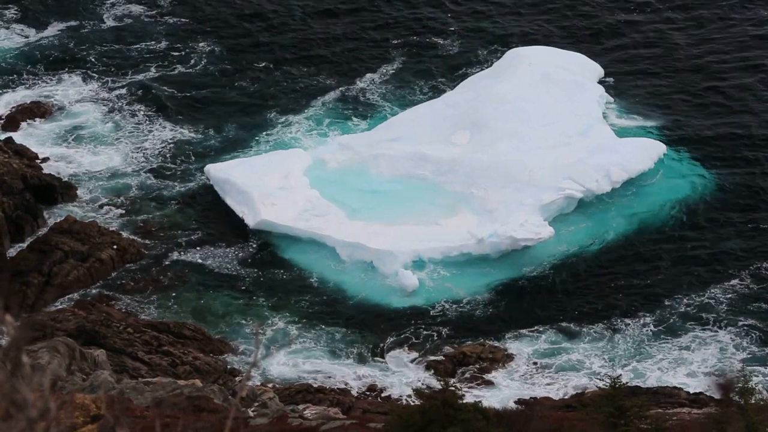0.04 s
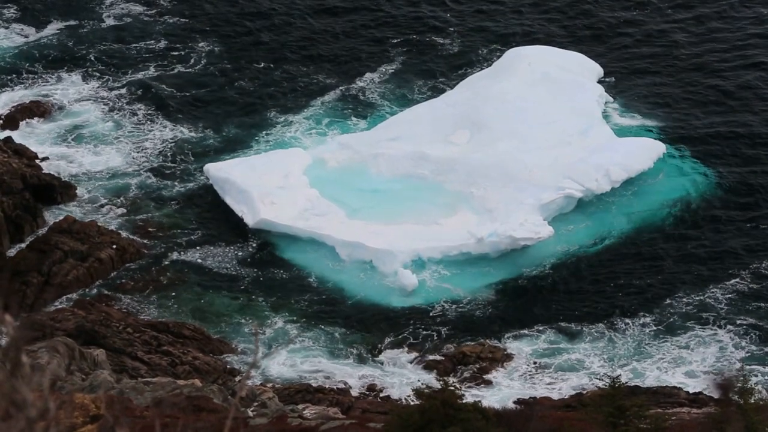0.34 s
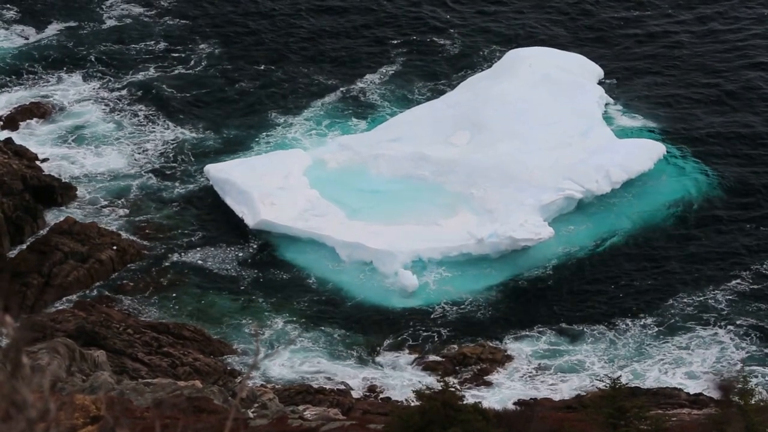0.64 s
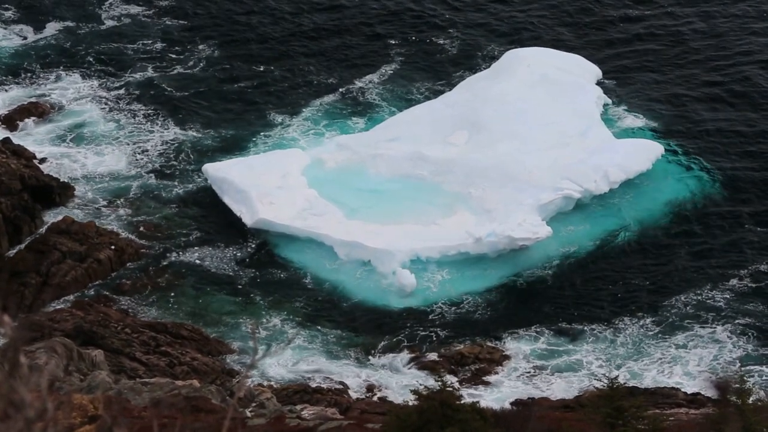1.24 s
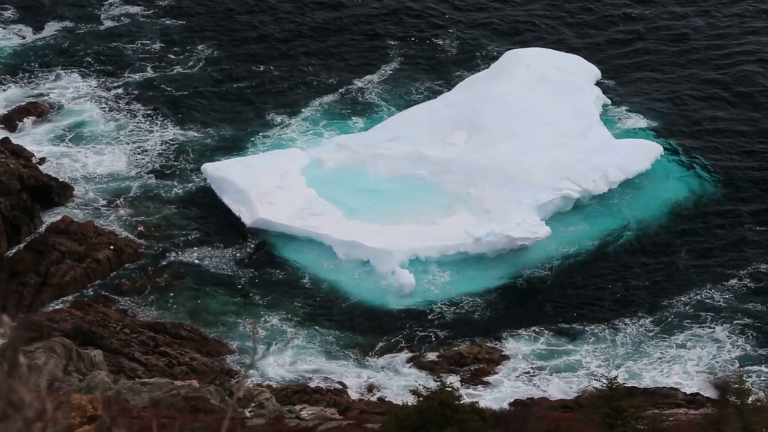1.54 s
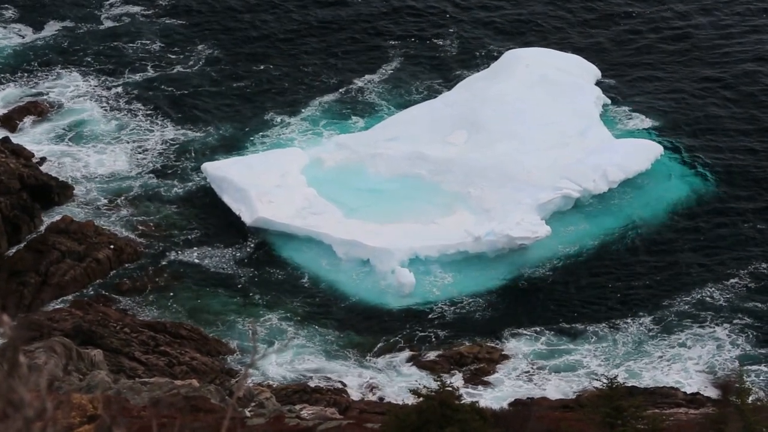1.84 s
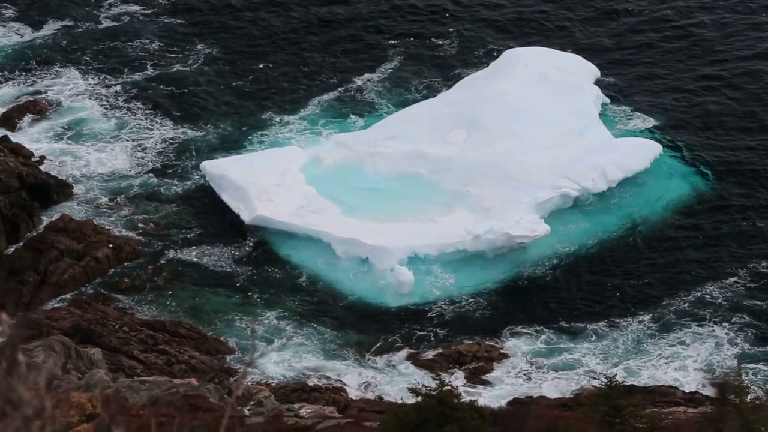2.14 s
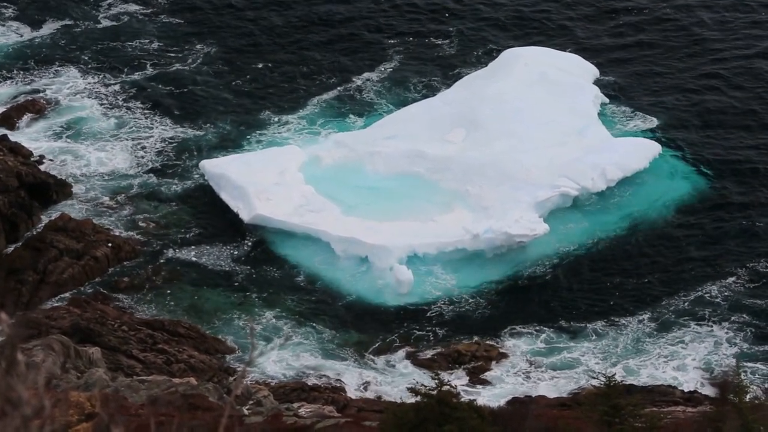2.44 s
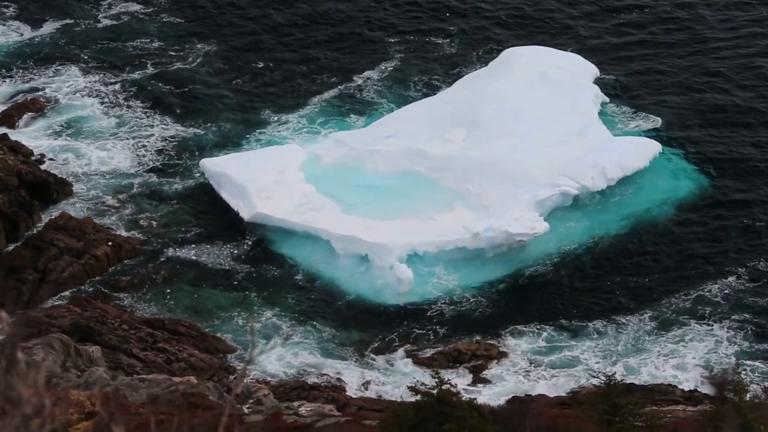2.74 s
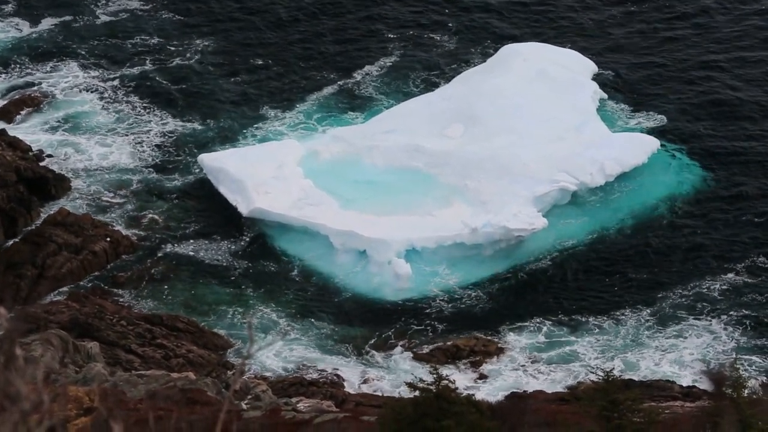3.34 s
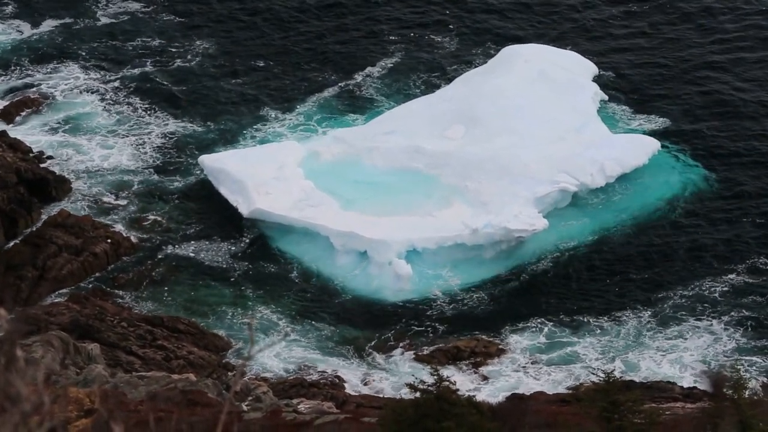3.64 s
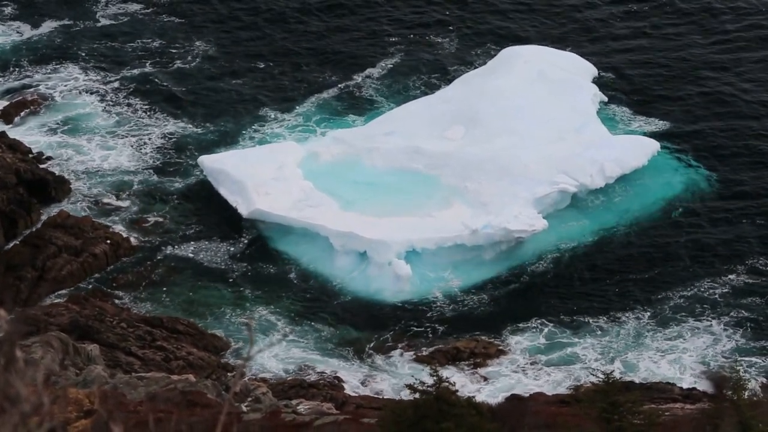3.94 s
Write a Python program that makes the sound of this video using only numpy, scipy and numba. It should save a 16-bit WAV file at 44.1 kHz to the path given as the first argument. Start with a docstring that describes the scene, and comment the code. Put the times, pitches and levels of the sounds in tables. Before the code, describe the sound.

Wind rumbles and thumps on a cliff-top microphone, hard at first, then in scattered lighter puffs. Far below, surf washes over rocks with a soft roar and a faint hiss of foam.

```python
"""Gusts rumble on the microphone, hard in the first second, then in scattered puffs, as eddies
strike it and the airflow tears off its housing. It stands on a cliff top; far below, surf washes
over rocks: a soft roar, a hiss of foam above it and a few small slaps of water. The hardest buffets
overload the recorder, whose gain control ducks the sea and slowly lets it back."""
import sys
import numpy as np
from scipy import signal
from scipy.fft import rfft, irfft
from scipy.io import wavfile
from scipy.ndimage import uniform_filter1d
from numba import njit

SR = 44100
rng = np.random.default_rng(int(sys.argv[2]) if len(sys.argv) > 2 else 0)


def persist_wave(psi):
    """Save psi, clipped to +-1, as 16-bit WAV."""
    counts = np.round(np.clip(psi, -1, 1) * 32767).astype(np.int16)
    wavfile.write(sys.argv[1], SR, np.atleast_2d(counts).T)


N = 176400


def undb(db):
    """Decibels to gain."""
    return 10 ** (np.asarray(db) / 20)


def unit(x):
    """Scale to rms 1."""
    return x / np.sqrt(np.mean(x ** 2))


def even(x, size):
    """Hold the level of a noise near 1 over spans of size samples."""
    return x / np.sqrt(uniform_filter1d(uniform_filter1d(x ** 2, size), size))


def curve(rows):
    """Join rows of time in seconds and value by straight lines."""
    return np.interp(np.arange(N) / SR, *np.array(rows).T)


def walk(rate):
    """Random levels held 1 / rate seconds and smoothed twice; spread near 1."""
    hold = int(SR / rate)
    held = rng.standard_normal(4096)[np.arange(N) // hold % 4096]
    return 1.3 * uniform_filter1d(uniform_filter1d(held, hold), hold)


def coloured_noise(points):
    """Noise at rms 1 whose spectrum follows (Hz, dB) points and falls away past their ends."""
    freqs = np.maximum(np.fft.rfftfreq(N, 1 / SR), 1)
    hz, db = np.array(points).T
    shape = undb(np.interp(np.log(freqs), np.log(hz), db))
    skirts = np.minimum(freqs / hz[0], 1) ** 2 * np.minimum(hz[-1] / freqs, 1) ** 5
    return unit(irfft(rfft(rng.standard_normal(N)) * shape * skirts, N))


def bands(x, low_hz, count):
    """Split x into overlapping half-octave bands that add up to x; gives (Hz, band) pairs."""
    freqs = np.maximum(np.fft.rfftfreq(N, 1 / SR), 1)
    place = np.clip(2 * np.log2(freqs / low_hz), 0, count - 1)
    spectrum = rfft(x)
    return [(low_hz * 2 ** (k / 2), irfft(spectrum * np.maximum(1 - abs(place - k), 0), N))
            for k in range(count)]


def wind():
    """Turbulence on the microphone: stronger gusts shed smaller eddies, so the rumble brightens."""
    # Wind pressure on the microphone. Each row: time in seconds, level in dB.
    gust_levels = [(0, -14), (.02, -14), (.09, -13), (.13, -20), (.17, -16.5), (.2, -27.5), (.25, -19),
                   (.31, -13.5), (.345, -10.5), (.38, -15.5), (.44, -18.5), (.48, -6.5), (.51, -13.5),
                   (.56, -10.5), (.59, -9), (.64, -16.5), (.67, -9), (.71, -9), (.76, -18), (.8, -18.5),
                   (.86, -22.5), (1.02, -23.5), (1.09, -35), (1.16, -27), (1.27, -35), (1.37, -37),
                   (1.42, -33.5), (1.46, -25.5), (1.49, -23), (1.55, -15), (1.62, -25), (1.67, -39.5),
                   (1.77, -38.5), (1.82, -29), (1.87, -40.5), (1.98, -41.5), (2.04, -33), (2.13, -39),
                   (2.29, -47), (2.35, -38.5), (2.48, -36), (2.7, -50), (3.19, -50.5), (3.24, -38),
                   (3.32, -46), (3.4, -41), (3.6, -48), (3.67, -42), (3.75, -40), (3.8, -27.5),
                   (3.85, -30.5), (3.91, -31.5), (4, -38.5)]
    # Turbulence in a moderate gust. Each row: frequency in Hz, relative density in dB.
    rumble_spectrum = [(18, -1), (35, 4.5), (65, 3), (125, -1.5), (200, -14.5), (320, -26), (550, -43.5),
                       (1000, -59.5), (2000, -80)]
    trim_db, moderate_db, brighten = 2, -19.5, 0.24  # brighten: dB per octave for each dB of gust
    flutter_db, full_flutter_hz = 6.5, 300
    gust_db, eddies = curve(gust_levels), walk(rate=70)
    flow = even(coloured_noise(rumble_spectrum), size=1800)
    out = 0
    for hz, band in bands(flow, low_hz=27, count=12):
        octaves = max(np.log2(hz / 80), 0)
        tilt = brighten * octaves * (gust_db - moderate_db)
        flutter = flutter_db * min(hz / full_flutter_hz, 1) ** 2 * (eddies - .5)
        out = out + band * undb(tilt + flutter)
    return out * undb(gust_db + trim_db)


def churn(x):
    """Moving water: all bands surge together and each flickers on its own."""
    surge_db, flicker_db = -0.87, 0.43
    surge = surge_db * walk(rate=3.5)
    return sum(band * undb(surge + flicker_db * walk(rate=26))
               for _, band in bands(x, low_hz=150, count=13))


def surf():
    """Breakers roar and foam hisses; heard from the cliff top, single splashes merge into a wash."""
    # Roar of the breakers and hiss of the foam. Each row: frequency in Hz, relative density in dB.
    roar_spectrum = [(30, 4.5), (100, 1.5), (170, -1), (280, -4.5), (420, -4.5), (580, -2), (800, -8.5),
                     (1080, -10.5), (1400, -16), (1800, -27.5), (2600, -36), (5000, -50)]
    foam_spectrum = [(900, 3.5), (1600, 6), (2200, 5), (2800, 1.5), (3600, 2), (5000, -1.5), (7000, -4),
                     (9000, -8.5), (10500, -19.5)]
    # How each swells and sinks. Each row: time in seconds, level in dB.
    roar_levels = [(0, -39), (.15, -38), (.4, -46.5), (.9, -44), (1.4, -42), (1.9, -40.5), (2.3, -43),
                   (2.7, -44), (3.3, -43), (4, -41.5)]
    foam_levels = [(0, -50.5), (.15, -58), (.35, -60), (.55, -60.5), (.9, -61), (1.6, -60), (2, -59),
                   (2.3, -58), (2.6, -59.5), (3.3, -58.5), (4, -59)]
    roar = churn(coloured_noise(roar_spectrum))
    foam = churn(coloured_noise(foam_spectrum))
    return roar * undb(curve(roar_levels)) + foam * undb(curve(foam_levels))


def flaps():
    """Air tears off the microphone housing in bursts of fine turbulence, brighter than the rumble."""
    # Each row: centre in seconds, level in dB, half length in seconds, top of the spectrum in Hz.
    bursts = [(0.093, -18, 0.013, 400), (.261, -15, 0.0049, 623), (0.276, -22, 0.0042, 600),
              (0.298, -14, 0.0066, 470), (0.336, -10.5, .003, 774), (0.356, -17.5, 0.018, 667),
              (0.398, -11.5, 0.0028, 500), (0.484, -20, 0.0053, 530), (0.538, -19, 0.0092, 507),
              (0.611, -20.5, .01, 400), (0.646, -9, 0.005, 577), (0.689, -20, 0.005, 560),
              (0.712, -22, 0.0091, 600), (0.797, -17.5, 0.0084, 472), (1.379, -18.5, 0.012, 367),
              (1.535, -22, 0.007, 285)]
    low_hz, fall_db = 178, -21.5
    t, out = np.arange(N) / SR, 0
    for at, db, half_length, top_hz in bursts:
        tear = even(coloured_noise([(low_hz, 0), (top_hz, fall_db)]), size=500)
        out = out + undb(db) * tear * np.exp(-((t - at) / half_length) ** 2)
    return out


def buffets():
    """Each eddy that strikes the microphone is one push of pressure with suction before and after."""
    # Each row: centre in seconds, peak in dB, pitch in Hz.
    eddies = [(.164, -4.5, 52), (.234, -3, 70), (0.2575, 3, 80.3), (0.342, -2.5, 150), (0.399, -4, 153),
              (.46, 9, 91), (0.703, 1.5, 61.1), (0.784, 2.5, 71.5), (1.017, -13.5, 72), (1.357, -7, 62),
              (1.368, 0, 85.2), (1.454, -15.5, 42), (1.571, -7.5, 69.3), (1.623, -11, 49.2),
              (1.817, -18.5, 55), (2.044, -26, 31.8), (2.077, -17, 69), (3.783, -19, 75), (3.816, -19, 44),
              (3.885, -34, 61.5), (3.915, -20, 51)]
    t, out = np.arange(N) / SR, 0
    for at, db, hz in eddies:
        offset_squared = np.minimum((np.pi * hz * (t - at)) ** 2, 50)
        out = out + undb(db) * (1 - 2 * offset_squared) * np.exp(-offset_squared)
    return out


def slaps():
    """Water slaps the rocks below: short bursts of noise in one broad resonance each."""
    # Each row: start in seconds, level in dB, resonance in Hz, its width in Hz, decay in seconds.
    hits = [(2.045, -51, 3480, 900, .004), (2.26, -51, 3700, 2500, .005), (2.304, -32.5, 950, 350, 0.0045),
            (2.306, -54, 2400, 2520, 0.0084)]
    t, freqs, out = np.arange(N) / SR, np.fft.rfftfreq(N, 1 / SR), 0
    for at, db, hz, width, decay in hits:
        resonance = 1 / (1 + (2 * (freqs - hz) / width) ** 2)
        ring = unit(irfft(rfft(rng.standard_normal(N)) * resonance, N))
        age = np.maximum(t - at, 0)
        envelope = np.minimum(age / .001, 1) * np.exp(-age / decay)
        out = out + undb(db) * ring * envelope
    return out


@njit
def gain_control(over_db, attack_s, recover_db_per_s, start_cut_db):
    """The recorder's gain cut in dB: rises quickly toward the excess level, then falls steadily."""
    out, cut = np.empty(len(over_db)), start_cut_db
    for i in range(len(over_db)):
        if over_db[i] > cut:
            cut += (over_db[i] - cut) / (attack_s * SR)
        else:
            cut = max(cut - recover_db_per_s / SR, 0.)
        out[i] = cut
    return out


def scene():
    """One microphone on the cliff top, with the sea far below and the wind right on it."""
    fade_in = np.minimum(np.arange(N) / 200, 1)
    return ((surf() + slaps() + wind() + buffets() + flaps()) * fade_in)[None]


def record(dry):
    """The recorder ducks after hard buffets, clips what gets through first and cuts the top treble."""
    limit_db, top_hz = -3.5, 10400
    pressure = dry[0]
    over_db = 20 * np.log10(abs(pressure) + 1e-9) - limit_db
    cut_db = gain_control(over_db, attack_s=0.0033, recover_db_per_s=5.5, start_cut_db=3.5)
    clipped = np.clip(pressure * undb(-cut_db), -1, 1)
    lowpass = signal.ellip(6, .1, 55, top_hz, fs=SR, output="sos")
    return signal.sosfilt(lowpass, clipped)[None]


dry = scene()
out = record(dry)
persist_wave(out)
```